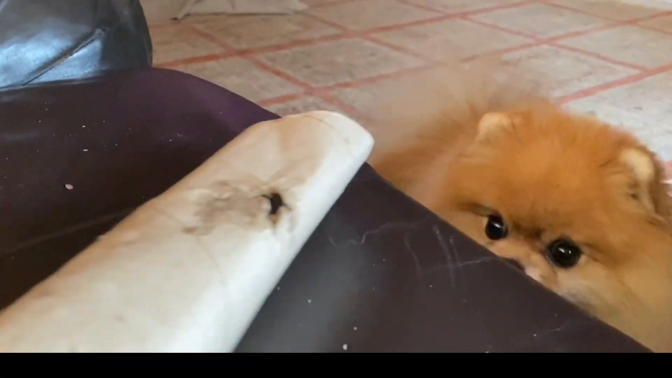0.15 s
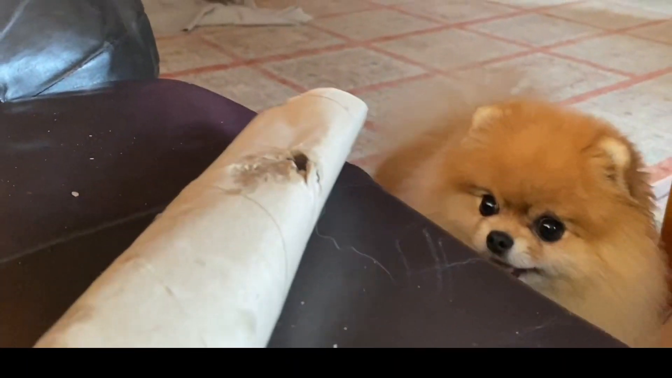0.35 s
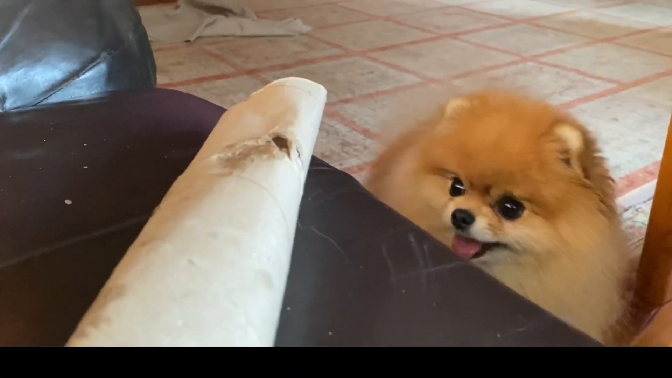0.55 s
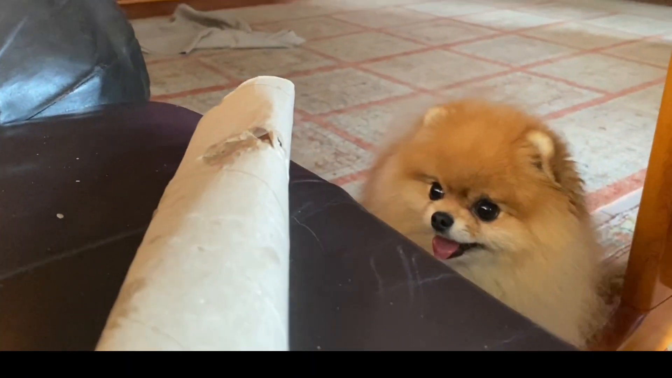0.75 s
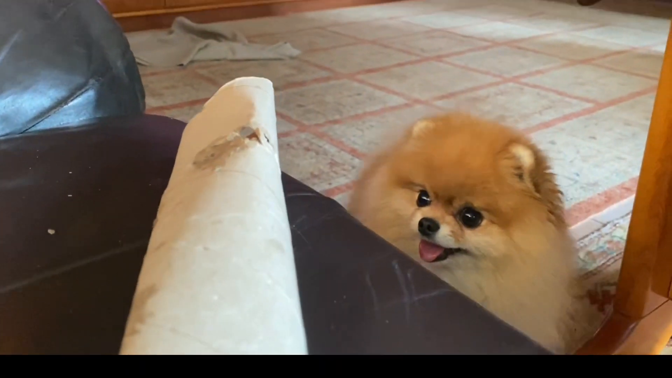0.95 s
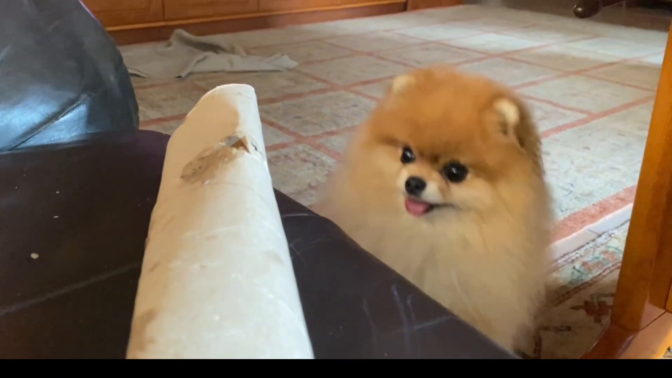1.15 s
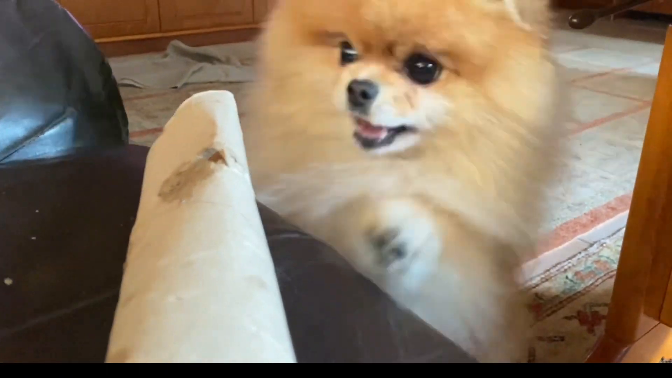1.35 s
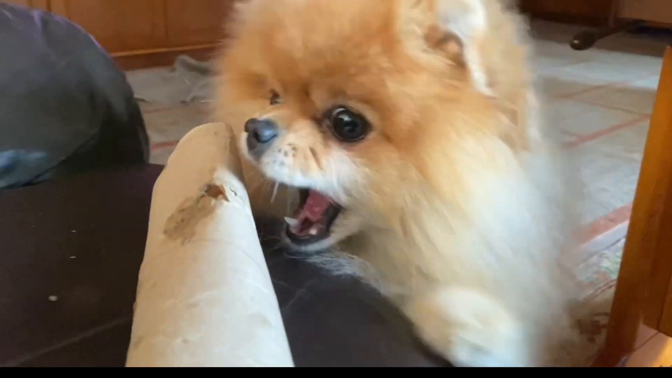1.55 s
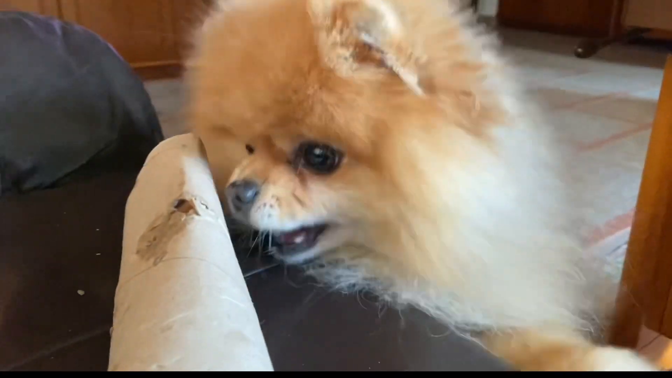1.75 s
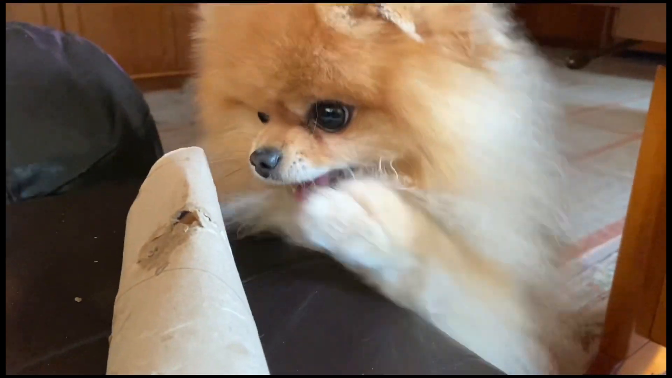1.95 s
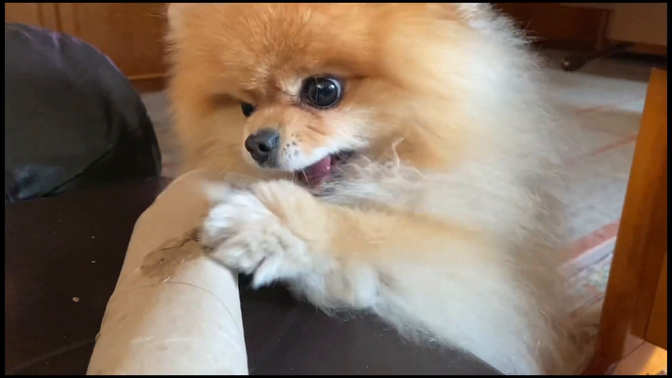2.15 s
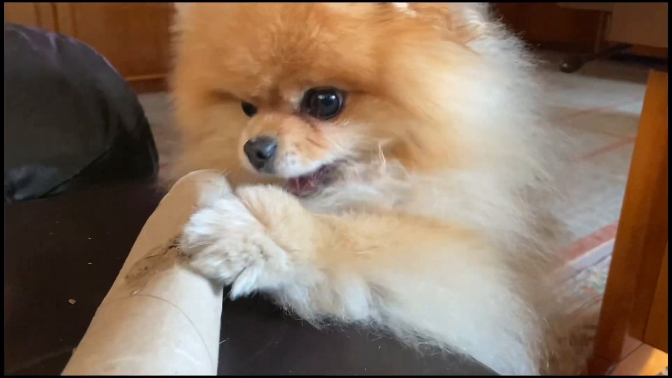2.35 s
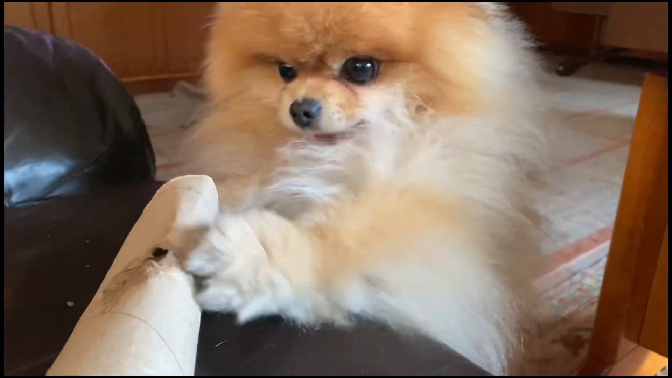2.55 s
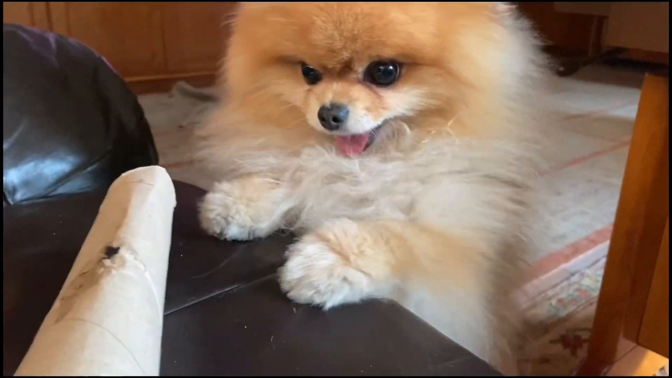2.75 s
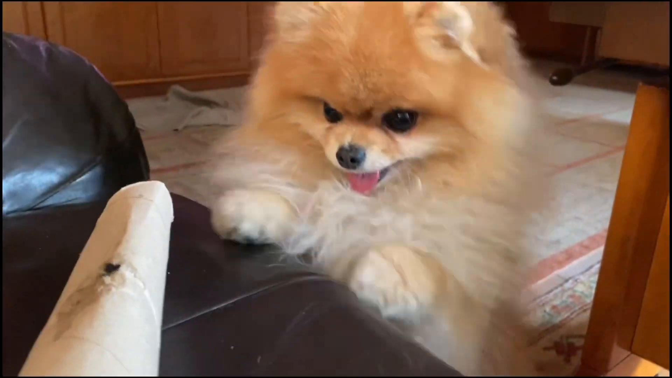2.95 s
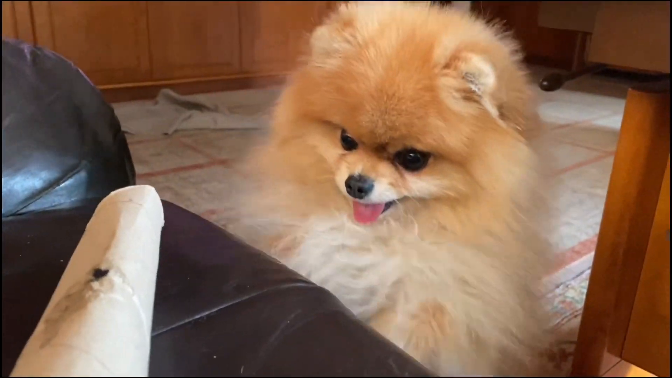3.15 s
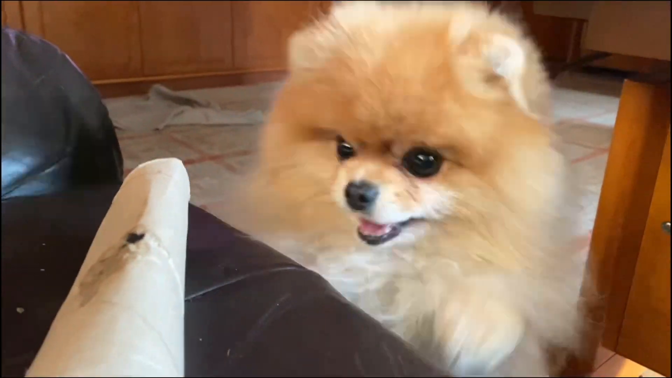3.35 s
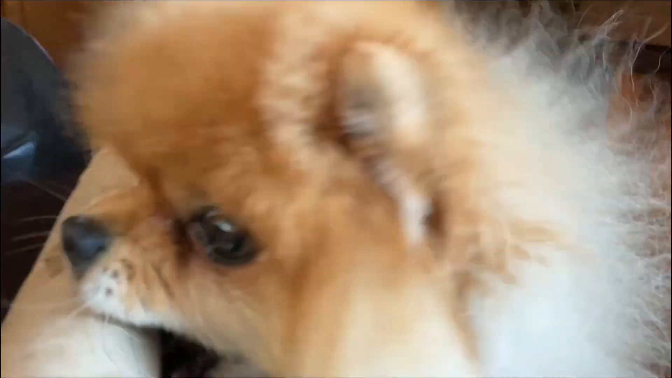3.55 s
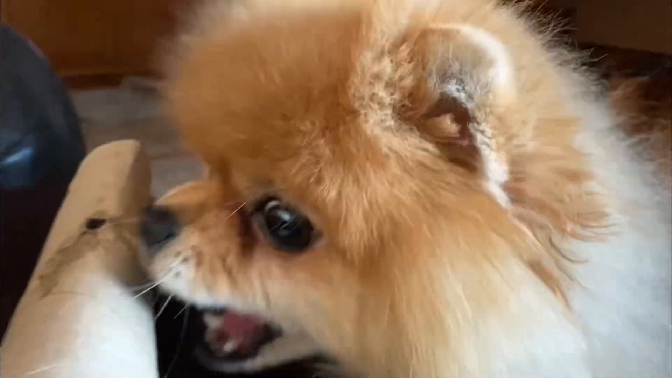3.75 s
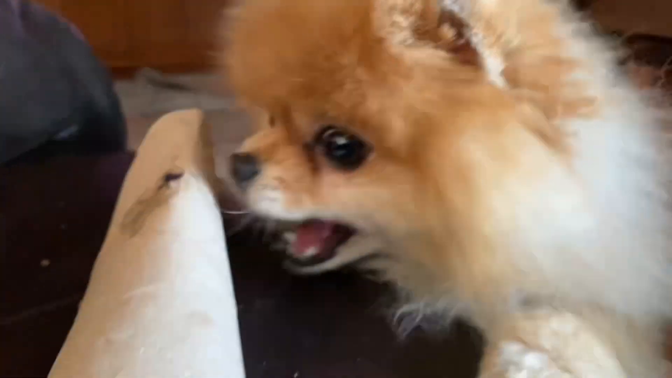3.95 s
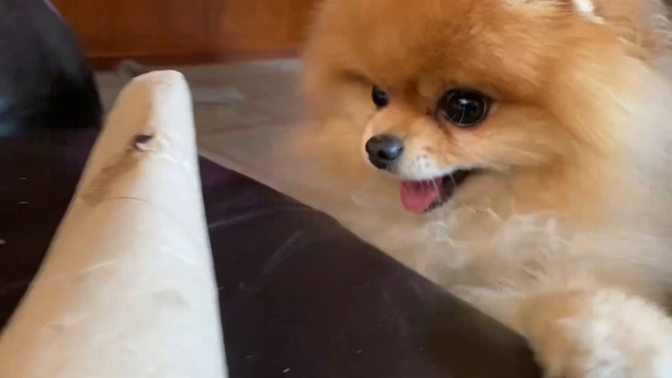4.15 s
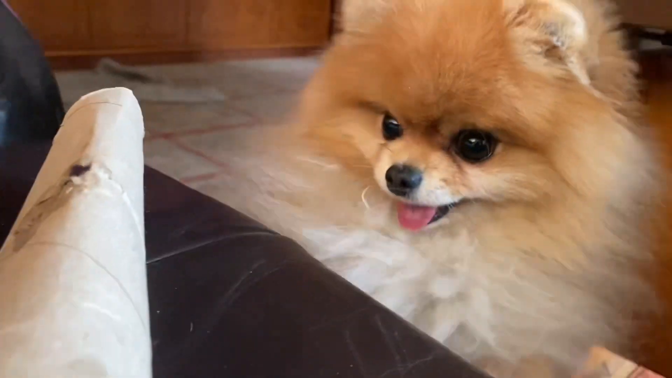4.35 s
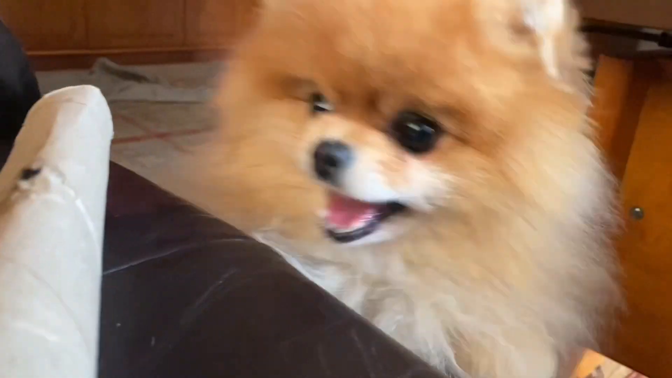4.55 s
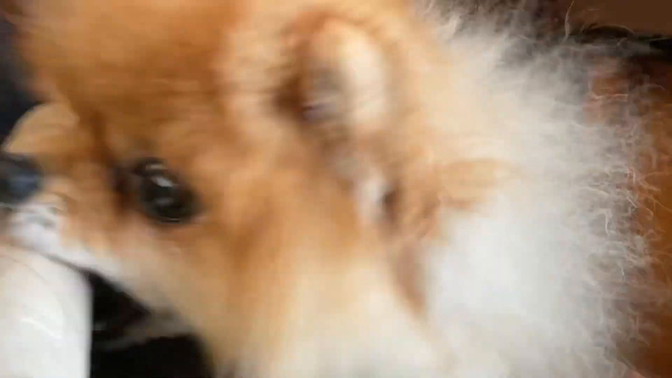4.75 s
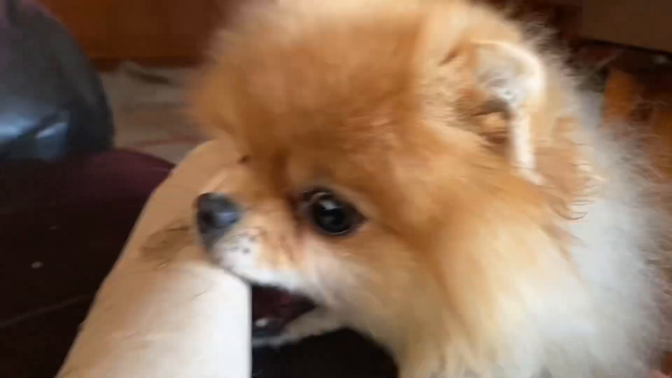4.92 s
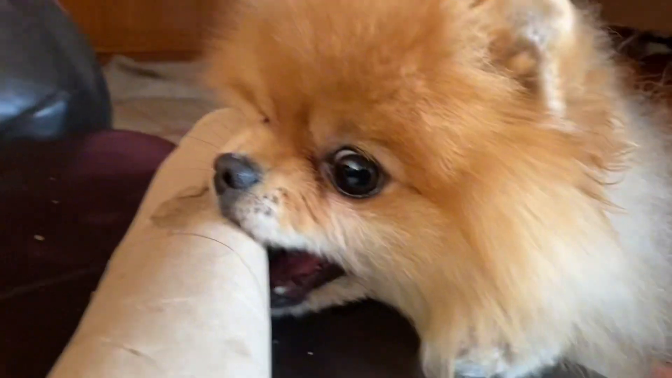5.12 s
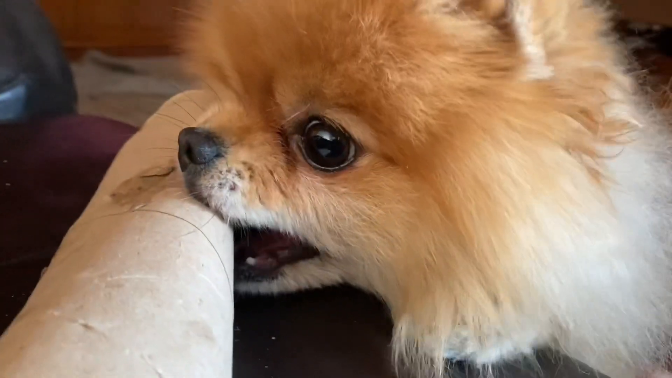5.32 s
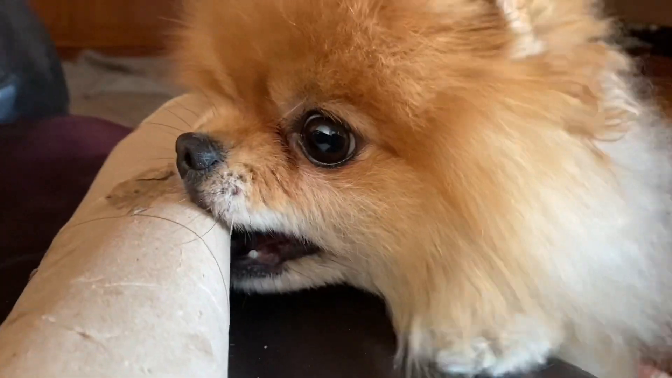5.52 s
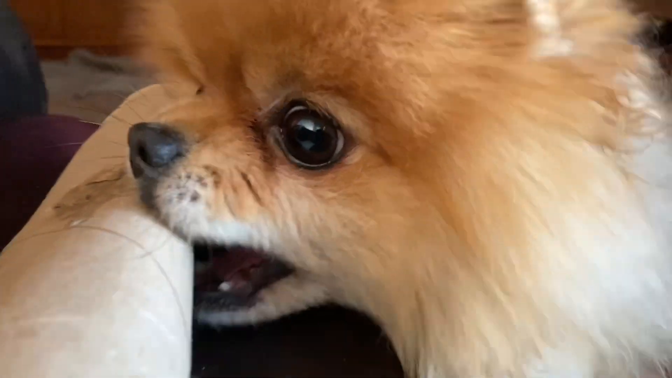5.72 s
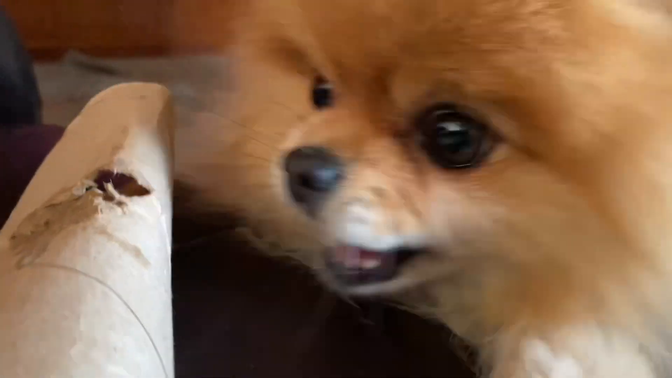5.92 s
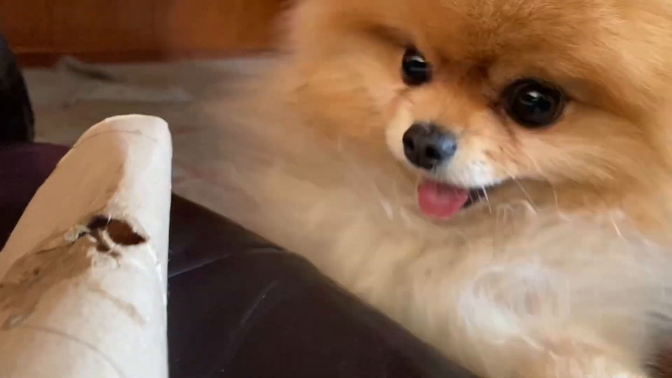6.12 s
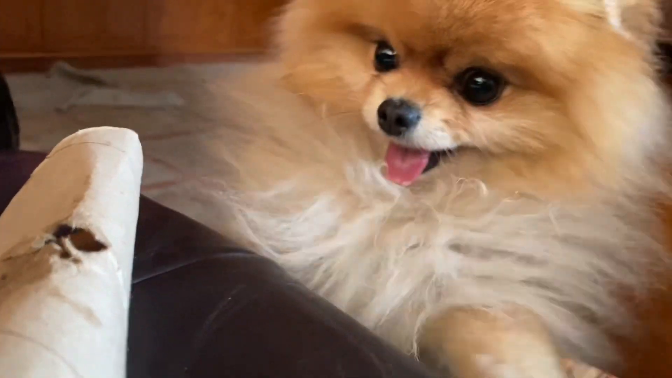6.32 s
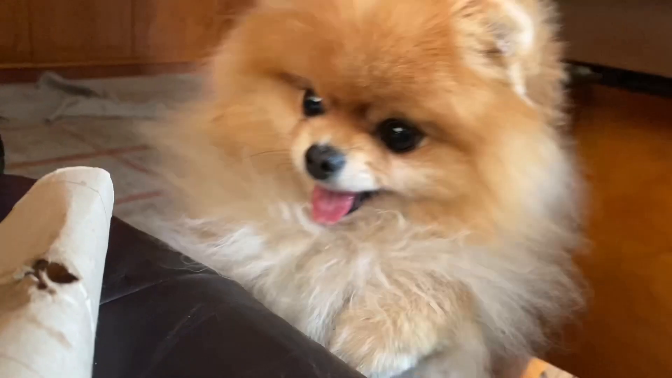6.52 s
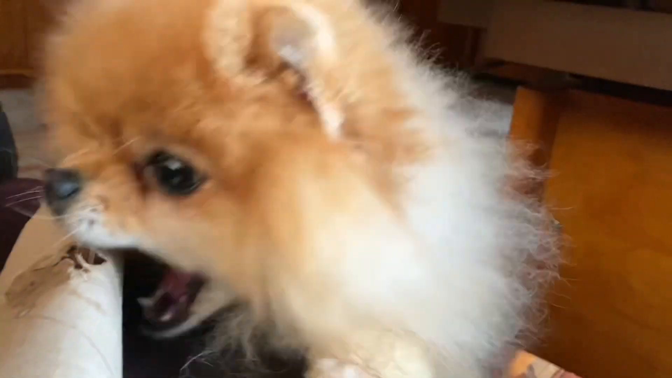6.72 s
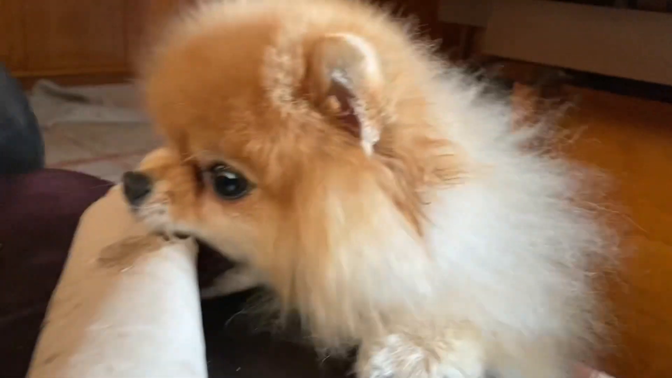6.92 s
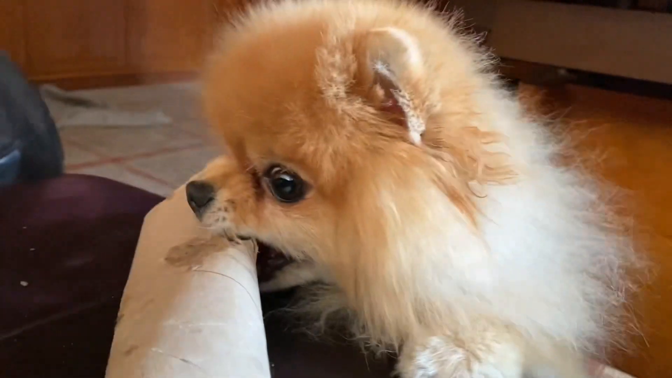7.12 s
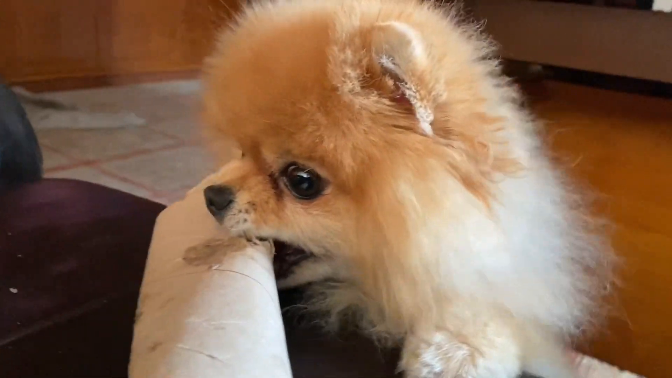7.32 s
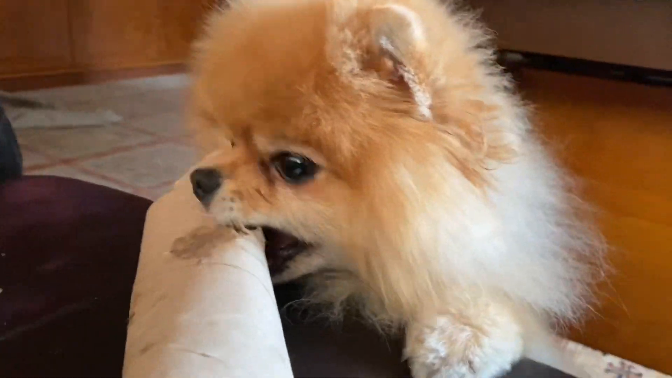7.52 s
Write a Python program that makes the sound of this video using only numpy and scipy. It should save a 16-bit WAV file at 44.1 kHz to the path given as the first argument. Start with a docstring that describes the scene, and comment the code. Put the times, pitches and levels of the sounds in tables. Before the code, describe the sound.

Close, dry indoor sound with a faint low room hush. From 0 to 1.2 seconds a cardboard tube slides over leather in grainy hissing strokes, gradually fading. Around 1.3 to 1.7 small taps, shuffling and fine crackle begin as a small dog reaches it. A hollow knock at 2.0 leads into stuttering paw scrapes, then a strong cluster of cracks and knocks at 2.5 to 2.6 with a low cushion thump. Quiet rubbing and soft panting follow. Sharp hollow blows hit at 3.5, with lighter bumps near 4.1. Another heavy cluster at 4.7 brings a short deep thump, dragging and tooth clicks. At 5.5 to 5.75 cardboard crunches and rasps roughly; a distinct tooth click follows at 5.9. After a calmer gap with faint breaths, a hard bright bite cracks at 6.75, then clicks, light rubbing and a round hollow pop at 7.4.

```python
"""A dry hiss comes first: a cardboard tube slides over a leather sofa, heard as grainy noise in strokes.
A small dog then paws and bites the empty tube: knocks and a round pop ring its hollow and wall,
cracks are bright bursts of noise, and rasps and crackles are many tiny slips and snaps.
The cushion thumps with low fading tones, teeth click, and the dog's panting is soft puffs of noise.
All this is close by, over the low hush of a carpeted room."""
import sys
import numpy as np
from scipy import signal
from scipy.fft import rfft, irfft, next_fast_len
from scipy.io import wavfile
from scipy.ndimage import map_coordinates

SR = 44100
rng = np.random.default_rng(int(sys.argv[2]) if len(sys.argv) > 2 else 0)


def unload_audio(sound):
    """Save the sound as a 16-bit wav file, at the path given as the first command line argument."""
    columns = np.transpose(np.atleast_2d(sound))
    # keep every value between -1 and 1, then stretch to whole-number steps
    steps = np.round(np.clip(columns, -1, 1) * 32767)
    wavfile.write(sys.argv[1], SR, steps.astype(np.int16))


N = 334278  # length in samples
TOP_HZ = 16000  # nothing is kept from here up

# Levels are relative. Colours give the shape of a noise; t60 is the time to fade by 60 dB.
# hush of the room: [f/Hz, level/dB]
QUIET_COLOUR = [(20, -13.5), (38, -2.5), (56, 9), (80, -1), (160, -14.5), (330, -19.5), (700, -23.5),
                (1100, -27), (2000, -36.5), (6000, -45.5), (16000, -62)]
# how long the room's answer lasts: [f/Hz, t60/s]
ROOM_FADE = [(100, 0.38), (700, 0.2), (4000, 0.15), (14000, .16)]
# microphone pair, phase by which left leads: [f/Hz, lead/rad]
LEAD = [(20, 0), (380, 0), (700, 1.6), (1100, 1.8), (1450, 3), (2000, 4.4), (2700, 6.3), (3500, 7.3),
        (5000, 7.3), (6000, 6.3), (8300, 3.2), (11000, 0), (13500, -3.1), (16000, -6.3)]
# microphone pair, left minus right: [f/Hz, level/dB]
TILT = [(200, 0.5), (450, -3.5), (680, 0.5), (900, 5.5), (1300, -1), (2200, 0), (3400, 6), (6000, 0),
        (9000, 0)]
# how alike the two channels of a wide noise are: [f/Hz, likeness 0 to 1]
ALIKE = [(100, 0.93), (700, 0.66), (2200, 0.63), (4000, 0.14), (9000, 1)]

# the dog's puffs of breath: [t/s, level/dB]
PANTS = [(1.824, -58), (2.825, -57.5), (2.925, -62.5), (3.01, -60.5), (3.687, -58.5), (3.77, -59),
         (3.948, -61.5), (4.151, -59), (5.006, -59), (5.355, -57.5), (6.005, -65.5), (6.28, -62),
         (6.445, -70)]
# colour of the breath: [f/Hz, level/dB]
PANT_COLOUR = [(300, -18.5), (850, -5.5), (1200, 4.5), (1550, -5.5), (1950, -6.5), (2500, -7.5),
               (3600, -9.5), (4800, -22), (10000, -40)]
PANT_S = 0.091  # length of one puff

# weight landing on the cushion: [t/s, f/Hz, level/dB, t60/s]
THUMPS = [(2.572, 61, -28.5, 0.49), (3.53, 66, -47, 0.35), (4.669, 61.3, -25.5, 0.16)]

# strokes of the tube over leather and fur: [t/s, length/s, level at the start/dB, change/dB per s]
SLIDES = [(-.05, 0.4, -56.5, -2.5), (0.367, 0.83, -60, -10.5), (1.322, 0.35, -67.5, 31),
          (1.72, .3, -75, -5.5), (2.026, .18, -55.5, 11.5), (2.27, 0.35, -59.5, 9), (2.747, 0.23, -61, -58),
          (3.083, .49, -64.5, 14.5), (3.606, .33, -62.5, -27.5), (4.037, 0.14, -78, 79),
          (4.659, .19, -53, -3), (4.874, .42, -71.5, -17), (5.374, .32, -77.5, 38.5),
          (5.713, 0.12, -53.5, -130), (6.08, .17, -76, 28), (6.649, 0.63, -64.5, -5.5),
          (7.466, 0.097, -68, 5)]
# colour of the sliding hiss: [f/Hz, level/dB]
SLIDE_COLOUR = [(150, -6), (450, -5), (720, 2), (950, -1.5), (1300, 1.5), (1850, 0), (2600, 0),
                (3500, -2.5), (4400, 0), (5700, -6.5), (8800, -3.5), (12000, -10.5), (16000, -14.5)]
# a stroke at this level takes this long to set off; one stronger by SLIDE_HALVES_DB takes half as long
SLIDE_ATTACK_S, SLIDE_ATTACK_AT_DB, SLIDE_HALVES_DB = 0.05, -59.5, 10
# a stroke stops in a fixed time plus a share of its length
SLIDE_STOP_S, SLIDE_STOP_SHARE = 0.07, 0.3
# the dog shifting its weight against sofa and tube: [t/s, length/s, level/dB]
SHUFFLES = [(.32, 0.093, -61), (1.33, 0.41, -57), (2.03, 0.28, -60), (2.56, 0.18, -59), (3.45, .33, -57.5),
            (4.63, 0.27, -52.5), (5.18, .17, -55.5), (5.5, .34, -55), (6.66, .36, -57), (7.25, 0.35, -55.5)]
# colour of the dull shuffling: [f/Hz, level/dB]
JOSTLE_COLOUR = [(40, -9), (100, 2.5), (200, 0.5), (400, -6), (680, -11), (1000, -12), (2000, -19.5),
                 (6000, -54)]
# share of a shuffle spent rising and falling; relative level of the steady stirring underneath
SHUFFLE_TAPER, FIDGET_DB = 0.54, -69

# teeth clicking: [t/s, mouth level/dB, bright tick level/dB]
CLICKS = [(1.404, -75, -50.5), (3.963, -71, -63), (4.83, -53, -53), (5.042, -70, -64), (5.097, -66, -81),
          (5.696, -61, -51), (5.9227, -43, -54), (6.886, -49.5, -57), (7.076, -57, -50.5),
          (7.3806, -55.5, -59), (7.5208, -62.5, -62.5)]
# ring of the mouth: [f/Hz, level/dB, t60/s]
JAW = [(1130, 2.5, 0.029), (2270, 0.5, 0.019), (2640, 10, 0.0083), (3170, 14, 0.0023)]

# the hollow squeezed in the jaws, one round pop: [t/s, level/dB]
POP = (7.398, -22)
# tones of the pop: [f/Hz, level/dB, t60/s]
POP_MODES = [(700, 4, 0.0089), (1376, 0, 0.0065), (200, -24, 0.02), (104, -41.5, 0.073)]

# fibres giving way under pressure: [t/s, length/s, level/dB]
GNAWS = [(.31, .1, -65), (1.47, 0.34, -60), (2.1, 0.14, -59), (2.425, 0.022, -52), (2.58, 0.04, -49),
         (3.42, .046, -59.5), (4.69, 0.184, -60), (5.03, 0.33, -68.5), (5.545, 0.128, -56),
         (6.73, 0.112, -63)]

# teeth and claws dragging over the cardboard: [t/s, length/s, level/dB]
RASPS = [(1.373, 0.015, -55.5), (2.525, .014, -42.5), (5.564, 0.015, -46), (5.598, 0.035, -35),
         (5.64, 0.015, -41.5), (5.721, 0.026, -48.5)]
# colour of the rasping: [f/Hz, level/dB]
RASP_COLOUR = [(100, -18), (190, 5.5), (420, -26.5), (800, 0), (1500, -7), (2000, -1.5), (2900, 0.5),
               (4600, -2.5), (7000, -8), (9200, -3), (12500, -16.5), (16000, -26.5)]
SLIP_HZ, SLIP_UNEVEN = 174, 0.2  # usual pace of stick and slip; share by which it wanders

# paw or muzzle stuttering along the tube: [t/s, length/s, level/dB]
DRAGS = [(1.47, 0.22, -62.5), (2.0, .3, -50), (2.593, 0.13, -62), (3.528, 0.047, -45), (3.67, 0.065, -55.5),
         (4.70, 0.18, -51.5), (4.85, 0.26, -62), (5.731, 0.05, -53), (7.29, 0.038, -56)]
# the hollow under a dragging paw: [f/Hz, level/dB, t60/s]
DRAG_RING = [(650, -0.5, 0.038), (1240, -15, .03), (1940, -16.5, .04)]

# hollow of the cardboard tube: [f/Hz, level/dB, t60/s]
HOLLOW = [(616.6, 1.5, 0.022), (670.2, 0, 0.038), (783, -4, 0.039)]
# wall of the cardboard tube: [f/Hz, level/dB, t60/s]
WALL = [(1210, -6, 0.018), (1365, 6, 0.0093), (1760, -10, 0.014), (1939, 1, 0.018), (2543, -2, 0.01)]
# the padded seat under the tube: [f/Hz, level/dB, t60/s]
PAD = [(112, 0.5, 0.037), (172, -3, .055), (258.5, -6.5, 0.057)]
# colour of breaking paper fibres: [f/Hz, level/dB]
CRACK_COLOUR = [(400, -17), (1500, 8.5), (2300, -2.5), (4500, -0.5), (6500, -5.5), (8500, 0),
                (11000, -11.5), (16000, -21.5)]

# the tube pressed dully into the seat: [t/s, level/dB]
BUMPS = [(1.321, -51.5), (2.431, -50), (2.591, -36), (3.435, -52.5), (4.11, -55.5), (4.165, -52.5),
         (4.648, -40), (4.733, -47), (4.798, -41), (4.978, -57), (5.207, -48), (5.667, -50.5),
         (6.662, -53.5), (6.945, -50.5)]
# what a bump stirs, relative to its thud; fading time of its crunch
BUMP_HOLLOW_DB, BUMP_WALL_DB, BUMP_CRACK_DB, BUMP_T60_S = -10.5, -15, -16, 0.037

# paws and jaws striking the tube: [t/s, hollow level/dB, wall level/dB, crack level/dB]
BLOWS = [(1.319, -61, -53.5, -61), (1.483, -53, -58, -64), (1.6922, -57, -45, -48.5),
         (1.701, -63, -49.5, -53), (2.0361, -37, -35.5, -43), (2.195, -47.5, -46.5, -48.5),
         (2.505, -59.5, -54.5, -52.5), (2.536, -37, -35, -32), (2.5687, -27.5, -29.5, -23),
         (3.5152, -25.5, -44.5, -44.5), (3.521, -30, -32.5, -30), (3.567, -33, -44, -50),
         (4.683, -29.5, -31, -36), (4.727, -34.5, -44.5, -45.5), (5.738, -44, -50.5, -42.5),
         (6.7597, -38, -27.5, -31.5)]
BLOW_THUD_DB = -9  # a blow's push into the padding, relative to its hollow ring
# crack's fading time when wall and hollow are equal; excess of wall over hollow that halves it
CRACK_T60_S, CRACK_HALVES_DB = 0.011, 13.5


def amp(db):
    """Turn decibels into a gain."""
    return 10 ** (np.asarray(db) / 20)


def unit(x):
    """Scale to rms 1."""
    return x / np.sqrt(np.mean(x ** 2) + 1e-20)


def blow_sized(x):
    """Scale a short sound to the energy of 10 ms at rms 1."""
    return x * np.sqrt(SR / 100 / (np.sum(x ** 2) + 1e-20))


def along(points, hz):
    """Read a value between (Hz, value) points on a log axis."""
    f, v = np.transpose(points)
    return np.interp(np.log(hz + 1), np.log(f + 1), v)


def wobble(rate):
    """A smooth random curve with this many knots a second."""
    knots = rng.standard_normal(int(N * rate / SR) + 4)
    return map_coordinates(knots, [np.arange(N) * rate / SR])


def filtered(x, response):
    """Shape a sound by a complex response of frequency."""
    n = x.shape[-1]
    m = next_fast_len(n + 8192)
    spectrum = rfft(x, m) * response(np.fft.rfftfreq(m, 1 / SR))
    return irfft(spectrum, m)[..., :n]


def noise(colour, size):
    """Coloured noise of rms 1."""
    return unit(filtered(rng.standard_normal(size), lambda hz: amp(along(colour, hz))))


def wide_noise(colour):
    """Two channels of coloured noise, partly alike: a shared part plus a part of opposite sign."""
    def shares(hz):
        turn = np.arccos(np.clip(along(ALIKE, hz), 0, 1)) / 2
        return amp(along(colour, hz)) * [np.cos(turn), np.sin(turn)]

    mid, side = filtered(rng.standard_normal((2, N)), shares)
    return unit(np.array([mid + side, mid - side]))


def swells(rows, taper):
    """A level that rises and falls once for each (s, length, dB) row."""
    out = np.zeros(N)
    for s, length, db in rows:
        add(out, s, amp(db) * signal.windows.tukey(int(length * SR), taper))
    return out


def grains(rate, grain):
    """Copies of one grain at random times and sizes, rate a second on average, rms 1."""
    kicks = (rng.random(N) < rate / SR) * rng.standard_normal(N)
    return unit(signal.fftconvolve(kicks, grain)[:N])


def add(track, s, sound):
    """Mix a sound into a track at time s."""
    part = track[max(round(s * SR), 0):][:len(sound)]
    part += sound[:len(part)]


def ring(modes, attack, scatter_db, detune):
    """Fading tones of a struck body; each contact gives slightly new strengths and pitches."""
    t = np.arange(SR // 5) / SR
    hz, db, t60 = np.transpose(modes)[..., None]
    size, pitch = rng.standard_normal((2, len(modes), 1))
    levels = amp(db + scatter_db * size - 60 * t / t60)
    waves = levels * np.sin(2 * np.pi * hz * (1 + detune * pitch) * t)
    return blow_sized(waves.sum(0) * (1 - np.exp(-(t / attack) ** 2)))


def crack(t60, attack):
    """Paper fibres breaking: a bright burst that builds up and dies at once."""
    t = np.arange(SR // 5) / SR
    burst = noise(CRACK_COLOUR, size=len(t))
    return blow_sized(burst * amp(-60 * t / t60) * (1 - np.exp(-t / attack)))


def strike(thud_db, hollow_db, wall_db, crack_db, t60):
    """A contact cracks the surface, rings the wall and the hollow, and pushes the tube into the padding."""
    thud = amp(thud_db) * ring(PAD, attack=0.003, scatter_db=2.5, detune=0.07)
    hollow = amp(hollow_db) * ring(HOLLOW, attack=0.0034, scatter_db=1.5, detune=0.015)
    wall = amp(wall_db) * ring(WALL, attack=0.0007, scatter_db=2, detune=0.008)
    return thud + hollow + wall + amp(crack_db) * crack(t60, attack=t60 / 12)


def air_column(x, first_hz, echo, fade_hz):
    """Sound runs up and down the open tube, which lifts its evenly spaced upper resonances."""
    def round_trip(hz):
        upper = 1 - np.exp(-(hz / (2 * first_hz)) ** 2)
        return np.clip(echo, 0, 0.6) * upper * np.exp(-hz / fade_hz - 2j * np.pi * hz / first_hz)

    return filtered(x, lambda hz: 1 / (1 - round_trip(hz)))


def microphones(x):
    """Near sounds reach the two microphones with different phase and strength."""
    side = np.array([[1], [-1]]) / 2
    return filtered(x, lambda hz: amp(side * along(TILT, hz)) * np.exp(1j * side * along(LEAD, hz)))


def room_hush():
    """The quiet room is a steady, mostly low noise."""
    return amp(-63) * wide_noise(QUIET_COLOUR)


def room_answer(x, early_db, tail_db):
    """Sofa and furniture answer at once, the carpeted room faintly after."""
    hz, t, z = signal.stft(rng.standard_normal((2, SR // 2)), SR, nperseg=256)
    fade = amp(-60 * t / along(ROOM_FADE, hz)[:, None])
    tail = signal.istft(z * fade, SR, nperseg=256)[1]
    t = np.arange(tail.shape[1]) / SR
    early = rng.standard_normal(tail.shape) * np.exp(-t / 0.0054) * (t > 0.001)
    tail = tail * (1 - np.exp(-t / 0.0059))
    early = amp(early_db) * early / np.linalg.norm(early[0])
    tail = amp(tail_db) * tail / np.linalg.norm(tail[0])
    return signal.fftconvolve(x[None], early + tail, axes=1)[:, :N]


def panting():
    """Short puffs of air through the dog's open muzzle."""
    puffs = [(s, PANT_S, db) for s, db in PANTS]
    return swells(puffs, taper=0.66) * wide_noise(PANT_COLOUR)


def cushion():
    """The stuffed seat bounces at one low pitch for each landing."""
    out, t = np.zeros(N), np.arange(SR // 2) / SR
    for s, hz, db, t60 in THUMPS:
        level = amp(db - 60 * t / t60) * (1 - np.exp(-t / 0.0056))
        add(out, s, level * np.sin(2 * np.pi * hz * t))
    return out


def sliding():
    """Strength of the rubbing: each stroke sets off, gains or loses strength steadily, and comes to rest."""
    power = np.zeros(N)
    for s, length, db, db_per_s in SLIDES:
        t = np.arange(N) / SR - s
        attack = SLIDE_ATTACK_S * 0.5 ** ((db - SLIDE_ATTACK_AT_DB) / SLIDE_HALVES_DB)
        stop = SLIDE_STOP_S + SLIDE_STOP_SHARE * length
        moving = np.clip(t / attack, 0, 1) * np.clip(1 - (t - length) / stop, 0, 1) ** 2
        power += (moving * amp(db + db_per_s * np.clip(t, 0, length))) ** 2
    return np.sqrt(power)


def rubbing():
    """Dry cardboard hisses with a fine grain; the dog's weight adds dull shuffling and soft bumps."""
    grain_db = wobble(25) + 1.5 * wobble(700)
    strength = sliding() + amp(-89)  # a trace of hiss never stops
    hiss = amp(3.5 + grain_db) * strength * wide_noise(SLIDE_COLOUR)
    bump = ring(PAD + HOLLOW, attack=0.002, scatter_db=1, detune=0.02)
    shuffling = amp(2 * wobble(60)) * wide_noise(JOSTLE_COLOUR)
    lumps = shuffling + 0.7 * grains(70, bump)
    weight = np.hypot(swells(SHUFFLES, taper=SHUFFLE_TAPER), amp(FIDGET_DB))
    return hiss + amp(-2.5) * weight * lumps


def teeth():
    """Teeth meet with a short hard click, coloured by the mouth."""
    out = np.zeros(N)
    for s, db, tick_db in CLICKS:
        mouth = ring(JAW, attack=0.0003, scatter_db=1, detune=0.01)
        tick = crack(t60=0.014, attack=0.00042)
        add(out, s, amp(db) * mouth + amp(tick_db) * tick)
    return out


def pop():
    """Squeezed softly, the hollow gives one quickly fading note."""
    out = np.zeros(N)
    s, db = POP
    add(out, s, amp(db) * ring(POP_MODES, attack=0.0056, scatter_db=3.0, detune=0.00436))
    return out


def gnawing():
    """Squeezed cardboard crackles finely, each tiny snap coloured by the wall."""
    wall = ring(WALL, attack=0.0003, scatter_db=1, detune=0.01)
    snap = wall + crack(t60=0.005, attack=0.0002)
    return swells(GNAWS, taper=0.27) * grains(260, snap)


def rasps():
    """A dragged tooth sticks and slips at an uneven pace; every slip tears a tuft of fibres."""
    grip = np.zeros(N)
    for s, length, db in RASPS:
        pace = SLIP_HZ * (1 + SLIP_UNEVEN * wobble(150)[:int(length * SR)])
        slips = amp(-5.5 * np.cos(2 * np.pi * np.cumsum(pace) / SR))
        add(grip, s, amp(db) * unit(slips * signal.windows.tukey(len(pace), 0.25)))
    return grip * wide_noise(RASP_COLOUR)


def drags():
    """A dragged paw catches hundreds of times a second; each catch rings the hollow."""
    catch = ring(DRAG_RING, attack=0.0005, scatter_db=0, detune=0)
    return swells(DRAGS, taper=1.0) * grains(600, catch)


def bumps():
    """Pressed into the seat, the tube thuds and barely rings."""
    out = np.zeros(N)
    for s, db in BUMPS:
        add(out, s, amp(db) * strike(0, BUMP_HOLLOW_DB, BUMP_WALL_DB, BUMP_CRACK_DB, BUMP_T60_S))
    return out


def blows():
    """A soft paw mostly stirs the hollow; a hard tooth or claw rings the wall, and its crack is shorter."""
    out = np.zeros(N)
    for s, hollow_db, wall_db, crack_db in BLOWS:
        t60 = CRACK_T60_S * 0.5 ** ((wall_db - hollow_db) / CRACK_HALVES_DB)
        add(out, s, strike(hollow_db + BLOW_THUD_DB, hollow_db, wall_db, crack_db, t60))
        # the surface is grazed just before it gives
        add(out, s - 0.005, amp(crack_db - 22) * crack(t60=0.033, attack=0.0038))
    return out


def scene():
    """Contacts, rubbing and panting close by, over the hush of the room."""
    friction = air_column(rubbing(), first_hz=395, echo=0.2, fade_hz=13900)
    on_tube = gnawing() + rasps() + drags() + bumps() + blows()
    contacts = air_column(on_tube, first_hz=414, echo=0.23, fade_hz=12000) + teeth()
    near = microphones(panting() + cushion() + friction + pop() + contacts)
    # a small tube sends little bass into the room
    radiated = filtered(contacts.mean(0), lambda hz: hz ** 2 / (hz ** 2 + 250 ** 2))
    return room_hush() + room_answer(radiated, early_db=-10.5, tail_db=-16.5) + near


def record(dry):
    """Keep only what lies below the top frequency."""
    return filtered(dry, lambda hz: hz < TOP_HZ)


dry = scene()
out = record(dry)
unload_audio(out)
```